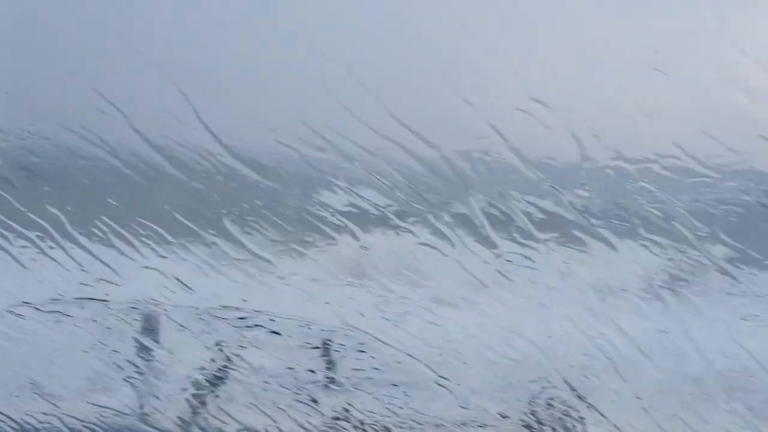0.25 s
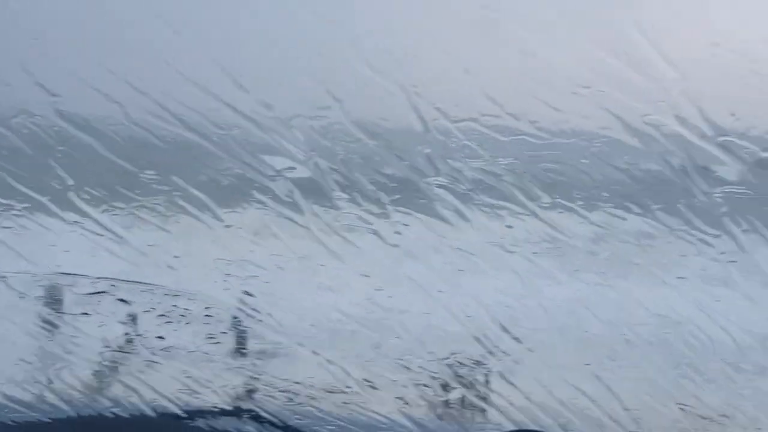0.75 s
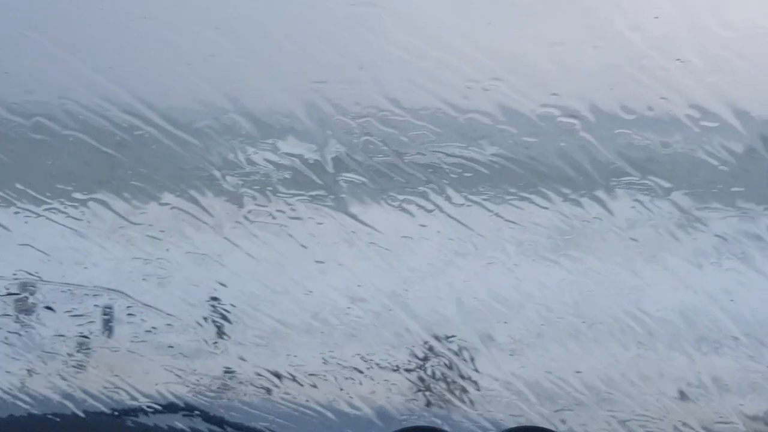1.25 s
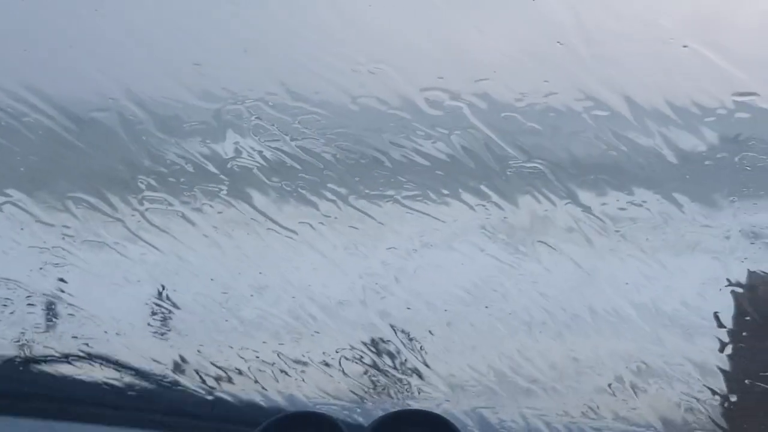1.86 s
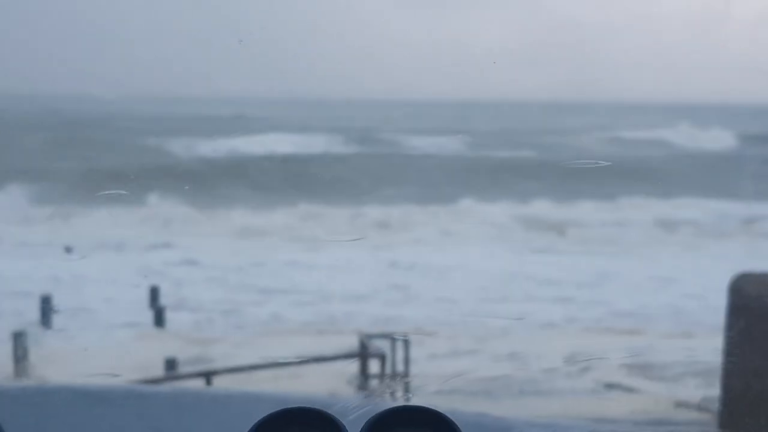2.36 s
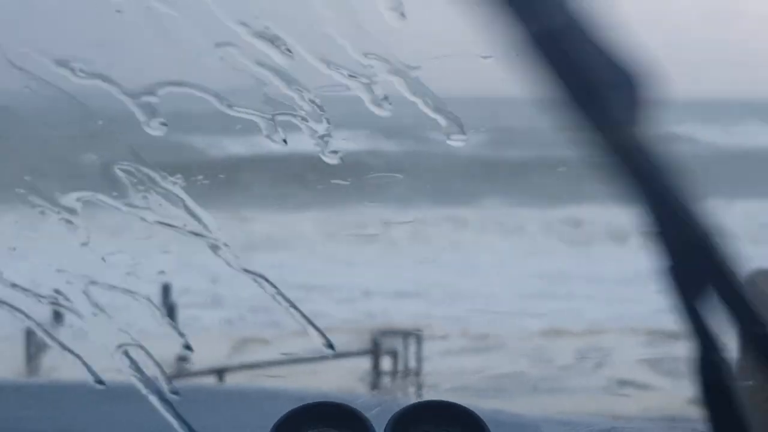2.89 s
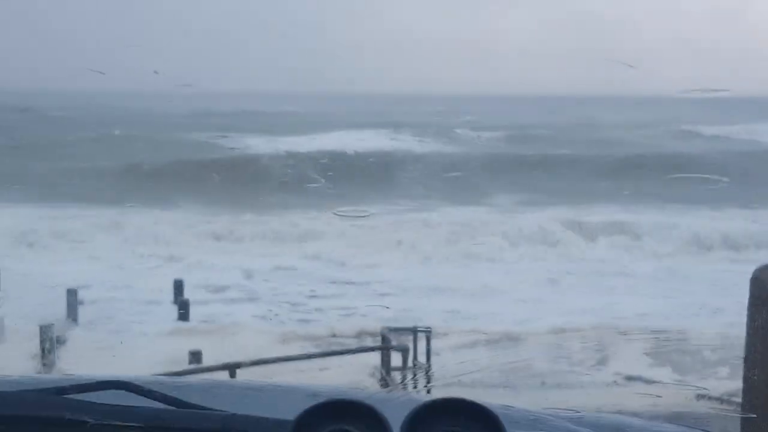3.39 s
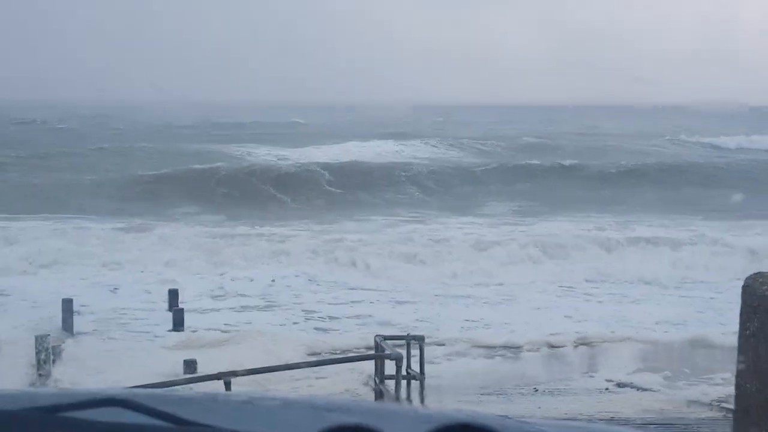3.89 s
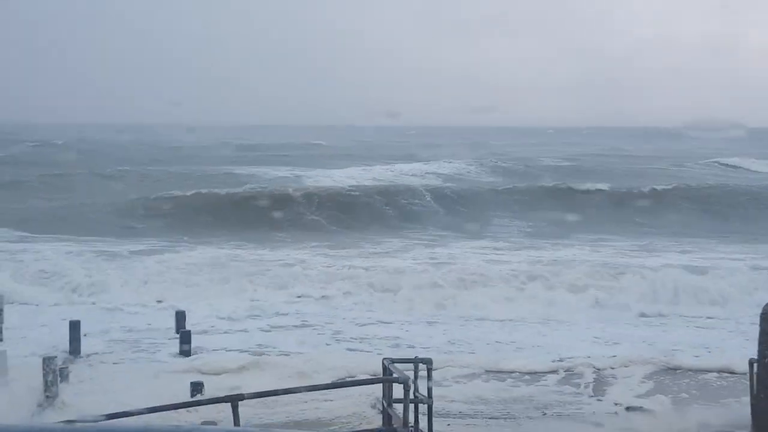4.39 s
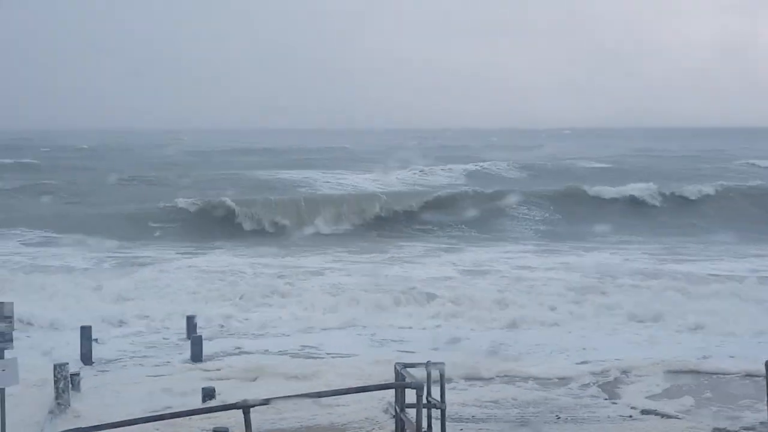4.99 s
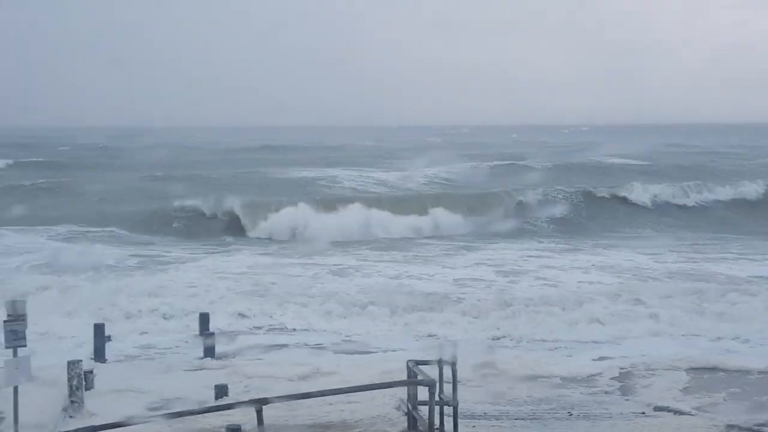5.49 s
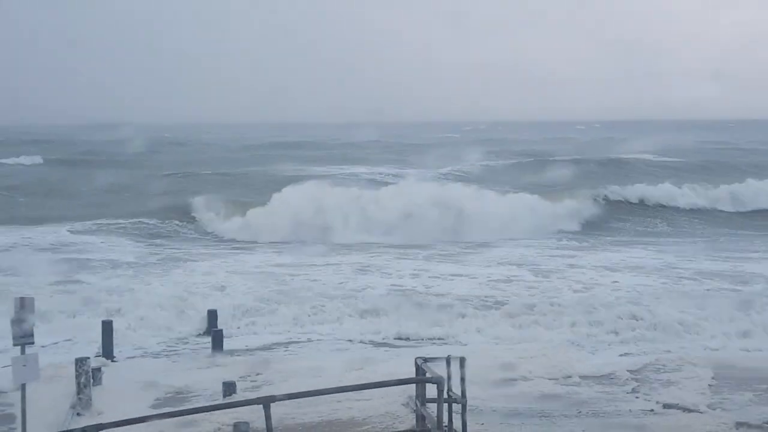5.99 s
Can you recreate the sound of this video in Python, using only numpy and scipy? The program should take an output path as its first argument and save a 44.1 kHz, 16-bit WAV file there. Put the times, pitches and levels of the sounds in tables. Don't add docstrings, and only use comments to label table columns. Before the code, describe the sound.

Heard from the seat of a parked van in a storm: low gusts pump the cabin air and drum on the body panels as rain and spray patter unevenly on the glass. A wiper makes one juddering sweep up and back, its joints thudding and clacking. Fat drops crack on the glass, and the heaviest handfuls of spray land near the end. Close stereo pickup inside the cabin.

```python
import sys
import numpy as np
from scipy import signal
from scipy.fft import rfft, irfft, next_fast_len
from scipy.io import wavfile
from scipy.ndimage import uniform_filter1d

SR = 44100
rng = np.random.default_rng(int(sys.argv[2]) if len(sys.argv) > 2 else 0)


def wav_record(signal):
    frames = np.transpose(np.atleast_2d(signal))
    bounded = np.clip(frames, -1, 1)
    quanta = np.round(bounded * 32767).astype(np.int16)
    wavfile.write(sys.argv[1], SR, quanta)


def voltage_ratio(decibels):
    exponent = np.asarray(decibels, float) / 20
    return 10 ** exponent


N = 275625


def rms_one(x):
    return x / np.sqrt(np.mean(x ** 2) + 1e-20)


def in_time(rows):
    s, *columns = np.transpose(rows)
    return [np.interp(np.arange(N) / SR, s, column) for column in columns]


def at_hz(points, hz, column=1):
    points = np.array(points)
    return np.interp(np.log(hz), np.log(points[:, 0]), points[:, column])


def drift(rate):
    step, warm_up = 40, 2000
    r = np.exp(-2 * np.pi * rate * step / SR)
    noise = rng.standard_normal(N // step + 2 + warm_up)
    slow = signal.lfilter([1], [1, -2 * r, r * r], noise)[warm_up:]
    return np.interp(np.arange(N) / step, np.arange(len(slow)), rms_one(slow))


def swells(rows, heights):
    t = np.arange(0, N + 64, 64) / SR
    total = sum(height * np.exp(-2 * ((t - row[0]) / row[1]) ** 2) for row, height in zip(rows, heights))
    return np.interp(np.arange(N) / SR, t, total)


def resonate(x, hz, width_hz):
    r = np.exp(-np.pi * width_hz / SR)
    feedback = [1, -2 * r * np.cos(2 * np.pi * hz / SR), r * r]
    return signal.lfilter((1 - r * r) / 2 * np.array([1, 0, -1]), feedback, x)


# f/Hz, share heard alike [0-1], left-right level/dB, lag of right port/ms
PORT_PAIR = [(41.3, 0.99, 0.3, 0.024), (121, 0.98, -1, 0.033), (317, 0.68, 0.5, 0.039),
             (645, 0.37, 2.5, 0.44), (1300, 0.37, 0.5, 0.42), (2430, 0.4, 2, 0.43), (4570, 0.033, 3, 0.39),
             (7100, 0.027, -10, .41), (9500, 0.061, -2.5, .41), (13800, .1, 1.4, .41)]


def ports(three, hz):
    alike, pan_db = at_hz(PORT_PAIR, hz), at_hz(PORT_PAIR, hz, column=2)
    lag = round(at_hz(PORT_PAIR, hz, column=3) * SR / 1000)
    shared = np.array([three[0], np.roll(three[0], lag)])
    both = np.sqrt(alike) * shared + np.sqrt(1 - alike) * three[1:]
    return both * voltage_ratio([[pan_db / 2], [-pan_db / 2]])


def near(three, hz):
    alike, pan_db = 0.6, 4
    both = np.sqrt(alike) * three[0] + np.sqrt(1 - alike) * three[1:]
    return both * voltage_ratio([[pan_db / 2], [-pan_db / 2]])


def body(force, modes):
    total = 0
    for k, (hz, width_hz, db) in enumerate(modes):
        ring = resonate(resonate(force, hz, width_hz), hz, 2.83 * width_hz)
        total = total + (-1) ** k * voltage_ratio(db) / np.sqrt(width_hz) * ports(ring, hz)
    return rms_one(total)


def steadied(x, share):
    swing = np.sqrt(uniform_filter1d(np.mean(x ** 2, axis=0), size=1100) + 0.078)
    return rms_one(x / swing ** share)


def bank(force, spectrum, patchy_db):
    size = next_fast_len(N)
    hz_axis = np.maximum(np.arange(size // 2 + 1) * SR / size, 1)
    coloured = rfft(force, size) * voltage_ratio(at_hz(spectrum, hz_axis))
    lowest, highest = spectrum[0][0], spectrum[-1][0]
    for hz in lowest * 2 ** np.arange(0, np.log2(highest / lowest), 0.5):
        window = np.cos(np.pi * np.clip(np.log2(hz_axis / hz), -0.5, 0.5)) ** 2
        band = irfft(coloured * window, size)[:, :N]
        yield hz, voltage_ratio(patchy_db * drift(33)) * ports(band, hz)


def drops(per_s, spread_db):
    sizes = voltage_ratio(spread_db * np.minimum(rng.exponential(1, (3, N)), 6))
    sizes = sizes * rng.choice([-1, 1], (3, N))
    return rms_one(sizes * (rng.random((3, N)) < per_s / SR))


BLOW = 4000


def burst(rise_s, fall_s):
    t = np.arange(BLOW) / SR
    return (1 - np.exp(-t / rise_s)) * np.exp(-t / fall_s)


def blows(events, partials, width, crack_db, fall_s, hardness, rise_s, hear=ports):
    out = np.zeros((2, N))
    envelope = burst(rise_s, fall_s) + voltage_ratio(-12.5) * burst(0.0011, 0.013)
    for (s, db, hz), noise in zip(events, rng.standard_normal((len(events), 3, BLOW))):
        at = round(s * SR)
        rattle = noise * envelope
        rattle[:, round(rise_s * SR)] += voltage_ratio(crack_db)
        for _ in range(2):
            rattle = resonate(rattle, hz, hardness * hz)
        sound = 0
        for ratio, part_db in partials:
            part_hz = hz * ratio
            sound = sound + voltage_ratio(part_db) * hear(resonate(rattle, part_hz, width * part_hz), part_hz)
        out[:, at:at + BLOW] += voltage_ratio(db) * sound / np.abs(sound.mean(axis=0)).max()
    return out


# t/s, patter level/dB
SHOWER = [(0.0, -35.5), (0.26, -37), (0.65, -37), (0.85, -42), (1.01, -39.5), (1.2, -41.5), (1.69, -36.5),
          (1.85, -40), (2.3, -42.5), (2.85, -39.5), (3.05, -35.5), (3.33, -40), (4.14, -43.5), (4.6, -35.5),
          (4.92, -37), (5.5, -35.5), (5.73, -31), (6.25, -35.5)]
# t/s, length/s, rise in level/dB
SPRAY_SHEETS = [(0.155, 0.11, 2), (0.396, 0.042, 9.5), (0.54, 0.17, 4.5), (0.657, .04, 3.5),
                (0.71, 0.026, -1), (0.783, 0.054, 7), (0.976, 0.11, 4), (1.385, .04, -5.5),
                (1.512, 0.093, 6), (1.786, 0.024, 6.5), (1.9, 0.11, 6), (2.14, 0.054, 5.5),
                (2.603, 0.15, 6.5), (2.987, 0.051, 3.5), (3.107, 0.046, 2.5), (3.527, 0.072, 2.5),
                (3.67, 0.12, 5.5), (3.816, 0.037, 3), (4.046, 0.048, 4), (4.357, .07, -3.5),
                (4.613, 0.1, 3.5), (4.715, 0.033, 7.5), (4.97, 0.05, 3.5), (5.27, 0.091, 6.5),
                (5.417, 0.068, 5.5), (5.49, 0.031, 0.5), (5.59, 0.094, 4), (5.88, 0.017, 9.5),
                (5.96, 0.033, 0.5), (6.19, 0.021, 4)]


def downpour():
    shower_db, = in_time(SHOWER)
    sheet_db = swells(SPRAY_SHEETS, [row[2] for row in SPRAY_SHEETS])
    in_patter = 0.32
    return shower_db + in_patter * sheet_db, -6.5 + (1 - in_patter) * sheet_db


# t/s, length/s, boom level/dB
GUST_SWELLS = [(0.024, 0.29, -14.5), (0.28, .07, -19), (0.532, 0.16, -13), (0.708, 0.095, -12),
               (0.876, 0.1, -19.5), (1.042, 0.077, -14), (1.176, 0.068, -9.5), (1.282, 0.045, -15.5),
               (1.47, 0.041, -17.5), (1.56, 0.055, -15.5), (1.7, 0.056, -15), (1.83, 0.053, -11),
               (2.004, 0.082, -18), (2.12, 0.063, -27), (2.246, 0.032, -25), (2.631, 0.036, -18),
               (2.792, 0.031, -14.5), (2.93, 0.15, -22.5), (3.18, 0.055, -16.5), (3.293, 0.075, -18.5),
               (3.707, 0.14, -23.5), (3.97, 0.032, -20), (4.075, 0.024, -18.5), (4.266, 0.085, -22),
               (4.576, 0.27, -21), (4.816, 0.049, -15), (5.04, 0.19, -23), (5.5, 0.46, -27),
               (5.802, 0.17, -15), (6.09, 0.2, -16)]
# t/s, level/dB
DRUMMING = [(0.0, -24.5), (0.1, -24), (0.3, -23.5), (0.4, -18.5), (0.85, -25), (1.05, -25.5), (1.23, -34),
            (1.3, -28), (1.45, -35), (1.65, -27), (3.54, -27), (4.2, -31.5), (4.36, -29), (4.9, -27.5),
            (5.4, -27), (5.77, -24), (6.13, -25), (6.25, -29)]
# f/Hz, width/Hz, level/dB
CABIN_AIR = [(41.4, 12, 1), (49.3, 12.7, -2), (63, 19, -5.5)]
# f/Hz, width/Hz, level/dB
BODY_PANELS = [(96.3, 14.8, 0), (133.4, 38.6, -5), (175.5, 41, -5), (190.4, 48, -9.5)]
# f/Hz, level per Hz/dB
RUSH_COLOUR = [(120, -13), (200, -1.5), (372, 2.5), (431, -5), (486, -6), (595, -6), (851, -14),
               (1000, -14.5), (1300, -72), (2200, -120)]


def wind():
    noise = rng.standard_normal((3, 3, N))
    lull_db = -26
    boom = voltage_ratio(lull_db) + swells(GUST_SWELLS, voltage_ratio(np.array(GUST_SWELLS)[:, 2] - 3.5))
    drum_db, = in_time(DRUMMING)
    patter_db = downpour()[0]
    rush_db = -37 + 0.41 * (drum_db - drum_db.mean()) + 0.6 * (patter_db - patter_db.mean())
    gusty = noise[2] * voltage_ratio(2 * drift(20))
    rush = rms_one(sum(band for hz, band in bank(gusty, RUSH_COLOUR, patchy_db=-2)))
    booming = boom * steadied(body(noise[0], CABIN_AIR), share=0.67)
    drumming = voltage_ratio(drum_db) * steadied(body(noise[1], BODY_PANELS), share=0.29)
    return booming + drumming + voltage_ratio(rush_db) * rush


def flurries(per_s, strength, fall_s):
    landings = rng.exponential(strength, N) * (rng.random(N) < per_s / SR)
    fall, rise = np.exp(-1 / (fall_s * SR)), np.exp(-1 / (0.0025 * SR))
    sinking = signal.lfilter([1], [1, -fall], landings)
    return np.sqrt(1 + signal.lfilter([1 - rise], [1, -rise], sinking))


# t/s, peak level/dB, left-right level/dB
SPRAY_HANDFULS = [(0.0742, -30, -2.0), (0.1286, -24, 9), (0.3556, -27, 1), (0.3895, -35, 1),
                  (0.4903, -23.5, -2.0), (0.5891, -32, -5), (0.839, -35, 0), (1.4167, -28, -4),
                  (1.6033, -21, -0.5), (2.381, -23, 3), (3.2296, -26, 0), (3.5149, -26, -9),
                  (3.783, -23.5, 4), (3.98, -28, 3), (4.089, -25, -4), (4.1899, -32, 4), (4.6029, -23, -4),
                  (5.0599, -25, 1), (5.0938, -28, -3), (5.2021, -24, 6), (5.233, -23, 6), (5.3408, -26, 3),
                  (5.4914, -33, 10), (5.5438, -19, 6), (5.6583, -13.5, -2), (5.8296, -35, -3),
                  (6.0048, -22, -11), (6.063, -15, -1), (6.1544, -20, 4), (6.197, -26, 4)]
# f/Hz, level per Hz/dB
GLASS_COLOUR = [(450, 1.5), (700, -5), (1100, -1), (1700, -5), (2200, -3), (2800, -4.5), (3400, -7),
                (4100, -3.5), (5200, -6.5), (7200, -12), (8600, -20), (11000, -14), (14000, -15),
                (16400, -13.5)]


def rain():
    patter_db, spray_db = downpour()
    force = drops(4000, spread_db=2.5) + 1.28 * rng.standard_normal((3, N))
    swell = np.ones((2, N + BLOW))
    for s, db, pan_db in SPRAY_HANDFULS:
        at = round(s * SR)
        height = voltage_ratio(db - 20 - patter_db[at] - spray_db[at]) * voltage_ratio([[pan_db / 2], [-pan_db / 2]])
        swell[:, at:at + BLOW] += height * burst(0.001, 0.007)
    swell = swell[:, :N] * flurries(56, strength=0.26, fall_s=0.014) * voltage_ratio(drift(42))
    patter, spray = 0, 0
    for hz, band in bank(force, GLASS_COLOUR, patchy_db=1.6):
        band = band * swell ** np.clip(0.93 * np.log(hz / 900), 0.35, 1.3)
        if hz < 5000:
            patter = patter + band
        else:
            spray = spray + band
    return voltage_ratio(patter_db + 2) * (rms_one(patter) + voltage_ratio(spray_db) * rms_one(spray))


def pings():
    hits = drops(500, spread_db=2.5)
    dealt = rng.integers(0, 8, (3, N))
    rings = 0
    for k, hz in enumerate(np.geomspace(1500, 3600, 8)):
        ring = resonate(hits * (dealt == k) + 1e-18, hz, 0.34 * hz)
        rings = rings + voltage_ratio(at_hz(GLASS_COLOUR, hz)) * ports(ring, hz)
    return voltage_ratio(downpour()[0] - 8.5) * rms_one(rings)


# t/s, peak level/dB, ring f/Hz, thump of the roof sheet level/dB
FAT_DROPS = [(1.136, -33, 1880, -40), (1.3862, -25, 2360, -66), (1.6656, -26, 2430, -48),
             (2.9846, -22, 2560, -38), (3.2275, -17, 2700, -24.5), (3.485, -33, 2310, -40),
             (4.4942, -26, 2000, -36), (4.7246, -13, 2180, -34), (5.5777, -20, 2060, -55),
             (5.6077, -28, 2480, -52), (5.7955, -11.5, 2240, -19.5), (5.8727, -19, 2840, -43),
             (5.916, -19, 2550, -41)]


def drips():
    cracks = blows([row[:3] for row in FAT_DROPS],
                   [(0.75, 12), (1, 15), (1.27, 1), (1.5, -7), (1.85, -6)], width=0.13,
                   crack_db=9, fall_s=0.0035, hardness=1.12, rise_s=0.001996, hear=near)
    roof_hz = 654
    thumps = blows([(s + 0.00313, db + 0.5, roof_hz) for s, _, _, db in FAT_DROPS],
                   [(0.6, 5), (1, 0), (1.4, -5), (1.9, -28)], width=0.61,
                   crack_db=-6, fall_s=0.0089, hardness=1.45, rise_s=0.0005)
    return cracks + thumps


# t/s, peak level/dB, ring f/Hz
JOINT_THUDS = [(1.722, -19, 268), (1.791, -13.5, 313), (2.079, -27, 293), (2.114, -18, 422),
               (2.167, -16.5, 346), (2.255, -19, 320), (2.347, -20, 326), (2.515, -18.5, 357),
               (2.67, -27.5, 357), (2.862, -19.5, 391), (2.964, -27, 390), (3.059, -26.5, 376),
               (3.234, -17.5, 269)]
# t/s, peak level/dB, ring f/Hz
JOINT_CLACKS = [(1.7965, -14.5, 1100), (2.089, -27, 1010), (2.331, -26.5, 1030), (2.356, -26.5, 1040),
                (2.677, -31, 1050), (3.236, -30, 1100), (3.314, -26.5, 1190)]


def joints():
    thuds = blows(JOINT_THUDS, [(0.5, -16), (1, 7), (1.25, -5), (1.6, -23)], width=0.16,
                  crack_db=12, fall_s=0.0045, hardness=0.58, rise_s=0.00041)
    clacks = blows(JOINT_CLACKS, [(0.5, -12), (0.84, 15), (1, 24), (1.2, 10), (1.45, -4)], width=0.2,
                   crack_db=19, fall_s=0.005, hardness=1, rise_s=0.00067, hear=near)
    return thuds + clacks


# t/s, rubbing level/dB
BLADE_DRAG = [(1.6, -65), (1.72, -34.5), (1.9, -30), (2.1, -36.5), (2.4, -35.5), (2.75, -40.5), (2.94, -49),
              (3.29, -28.5), (3.55, -60)]
# t/s, length/s, arm level/dB, linkage level/dB
BLADE_JERKS = [(1.732, 0.02, -24, -21), (1.82, 0.039, -16.5, -21), (1.893, 0.062, -17.5, -39),
               (1.97, 0.032, -23, -40), (2.041, .04, -30, -17), (2.081, 0.039, -12, -10),
               (2.147, 0.054, -6.5, -23), (2.257, 0.036, -15.5, -13.5), (2.344, 0.031, -35, -15.5),
               (2.41, 0.024, -49, -30), (2.466, 0.018, -39, -49), (2.618, 0.086, -27, -37),
               (2.752, 0.097, -26.5, -32), (2.96, 0.11, -29.5, -30.5), (3.09, .1, -29, -31)]
# f/Hz, width/Hz, level/dB
ARM_MODES = [(106, 6.7, -0.5), (124.7, 9.2, 5.5), (133.4, 34, 4.5)]
# f/Hz, width/Hz, level/dB
LINKAGE_MODES = [(156.2, 9.2, -7.5), (179, 5.7, -2.5), (207.1, 8.1, -8)]
# f/Hz, width/Hz, level/dB
BLADE_MODES = [(270.6, 43, 9), (346, 20, -0.5), (398, 106, 7.5), (458, 150, -1.5), (587, 120, -3)]


def wiper():
    drag = voltage_ratio(in_time(BLADE_DRAG)[0])
    arm, linkage = (swells(BLADE_JERKS, voltage_ratio(db)) for db in np.transpose(BLADE_JERKS)[2:])
    slips = drops(250, spread_db=3) + 0.63 * rng.standard_normal((3, N))
    slips[1:] = 0.5 * slips[1:]
    arm_judder = (arm + voltage_ratio(-1.5) * drag) * steadied(body(slips, ARM_MODES), share=0.46)
    linkage_judder = (linkage + voltage_ratio(1.5) * drag) * steadied(body(slips, LINKAGE_MODES), share=0.54)
    rubbing = (drag + voltage_ratio(-20) * (arm + linkage)) * body(slips, BLADE_MODES)
    return arm_judder + linkage_judder + rubbing + joints()


def scene():
    return wind() + rain() + pings() + drips() + wiper()


def roll_off(x):
    return signal.sosfilt(signal.butter(12, 16800, fs=SR, output="sos"), x)


def record(dry):
    bass_cut_hz, top_cut_hz = 25.7, 15900
    thin = signal.sosfilt(signal.butter(2, bass_cut_hz, "high", fs=SR, output="sos"), dry)
    rounded = 0.95 * np.tanh(thin / 0.95)
    mix = signal.sosfilt(signal.ellip(12, 0.5, 70, top_cut_hz, fs=SR, output="sos"), rounded)
    return roll_off(mix)


dry = scene()
out = record(dry)
wav_record(out)
```